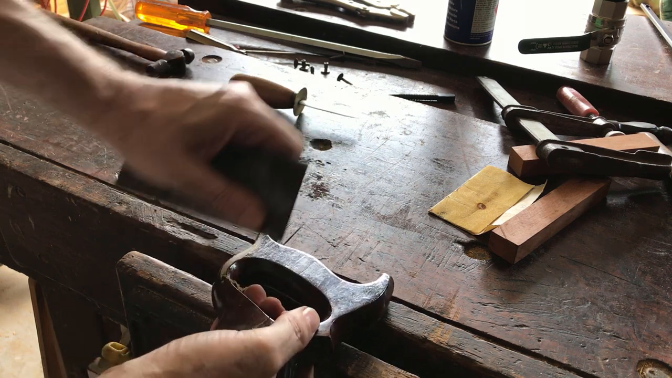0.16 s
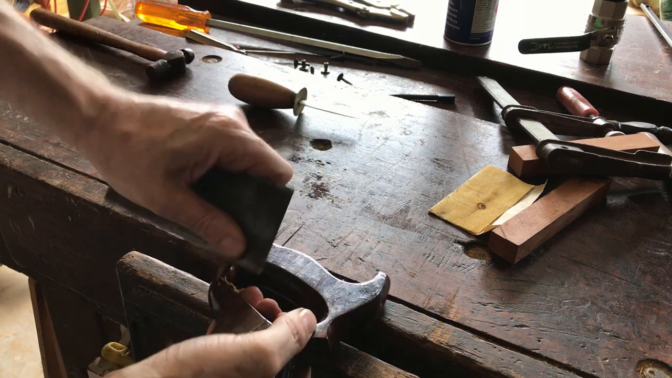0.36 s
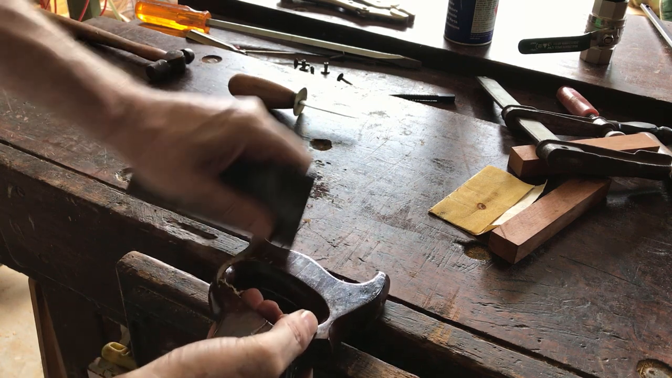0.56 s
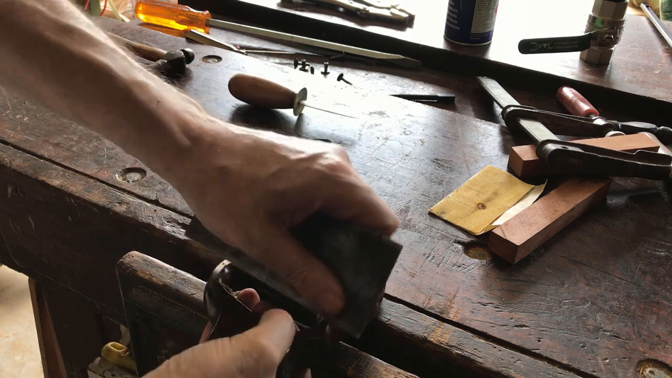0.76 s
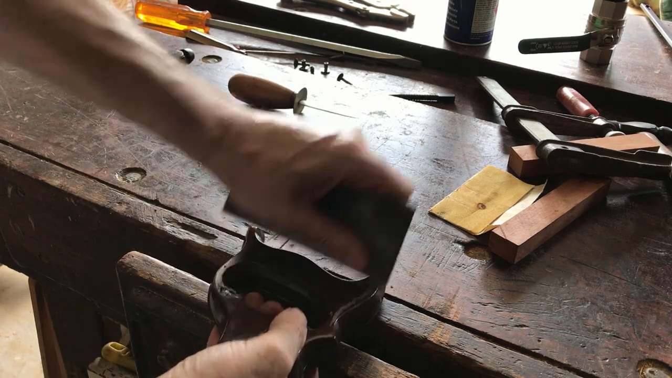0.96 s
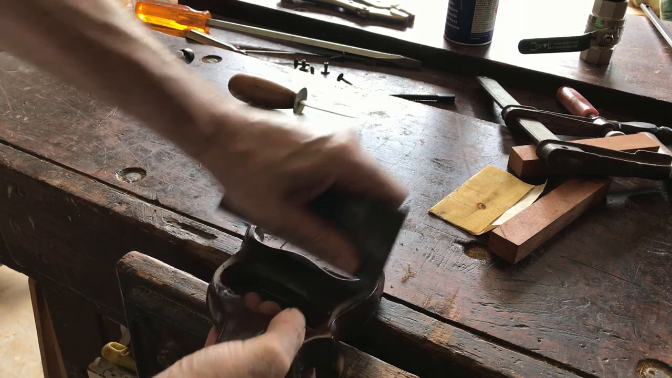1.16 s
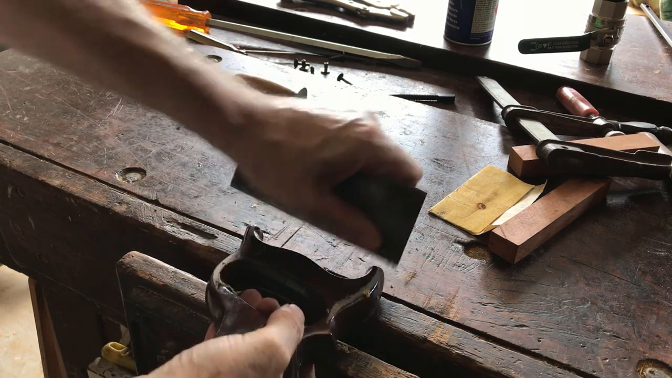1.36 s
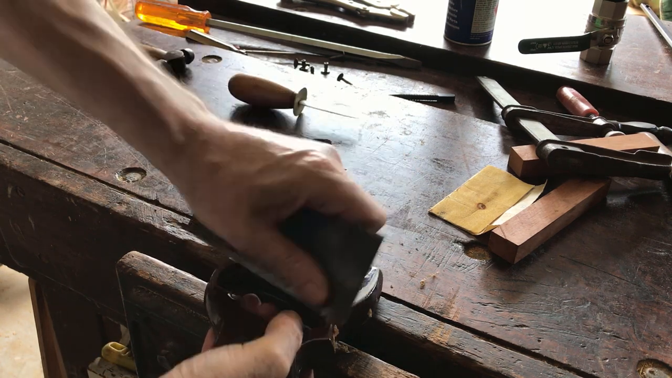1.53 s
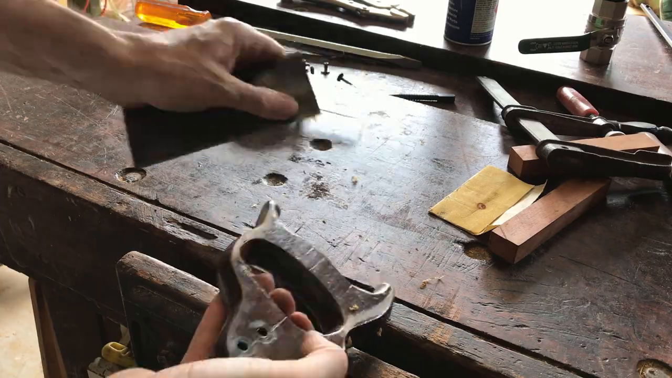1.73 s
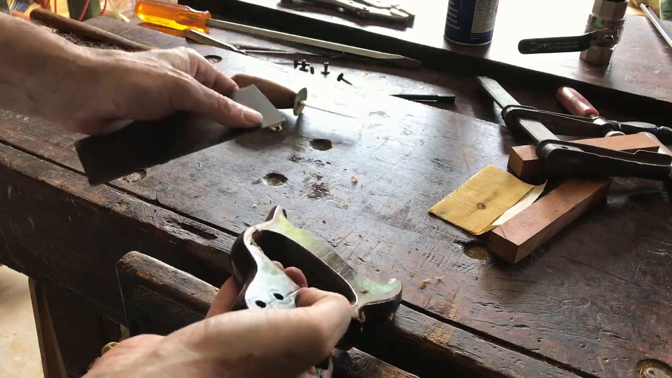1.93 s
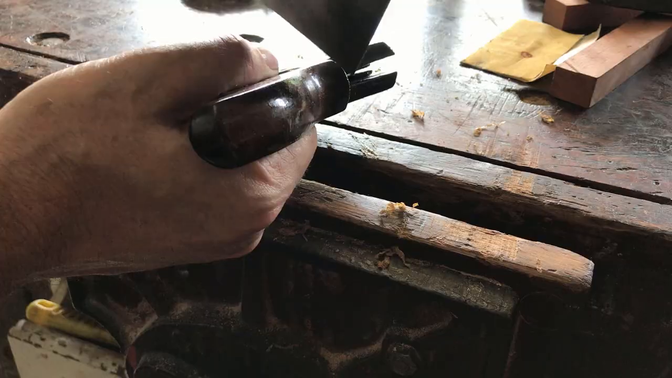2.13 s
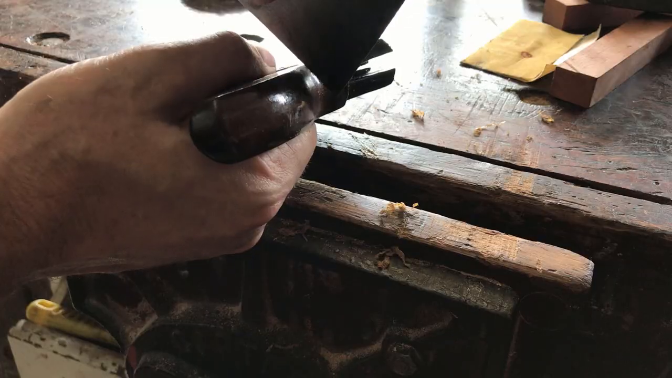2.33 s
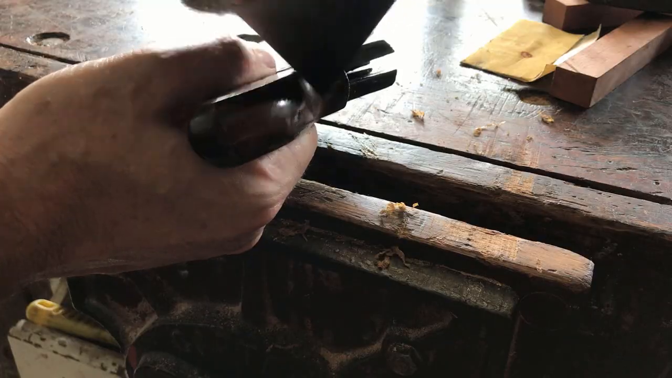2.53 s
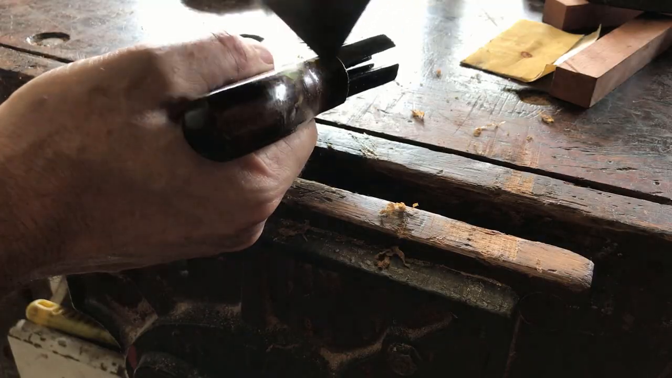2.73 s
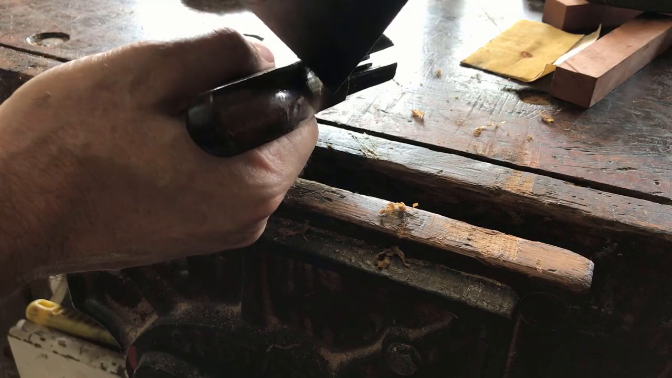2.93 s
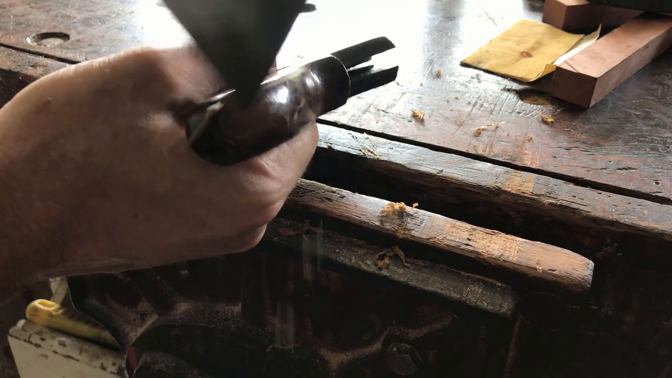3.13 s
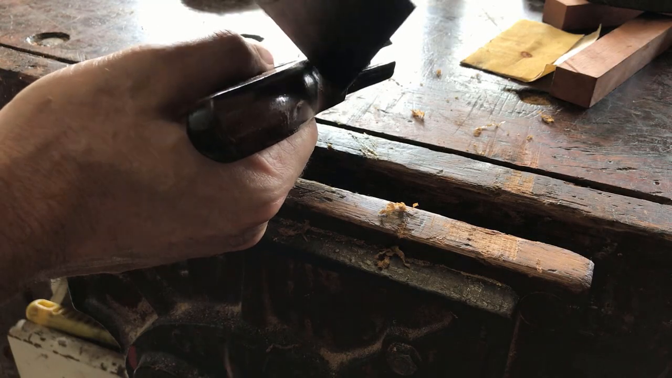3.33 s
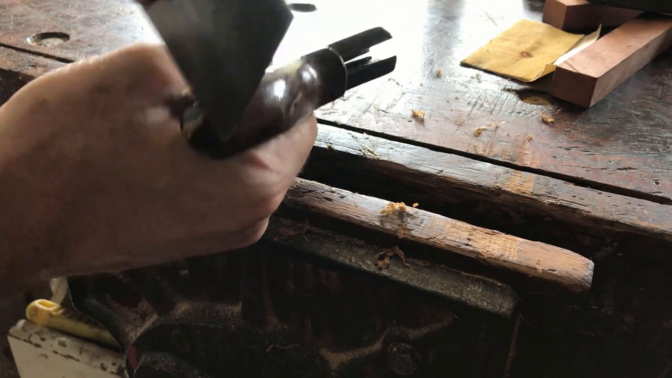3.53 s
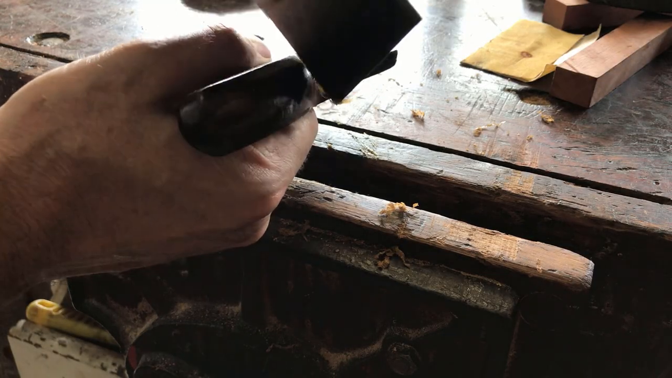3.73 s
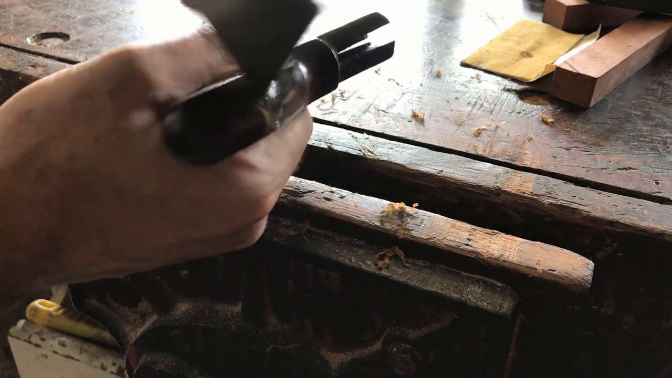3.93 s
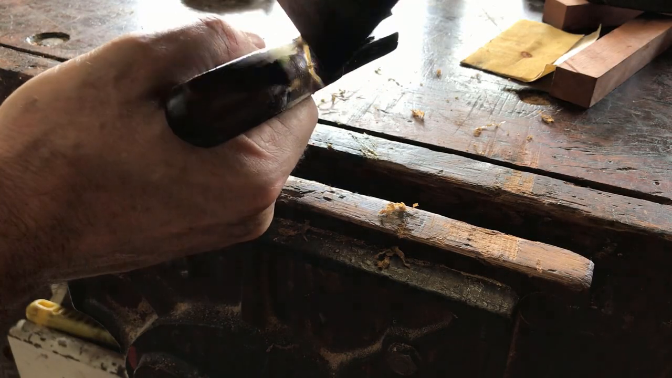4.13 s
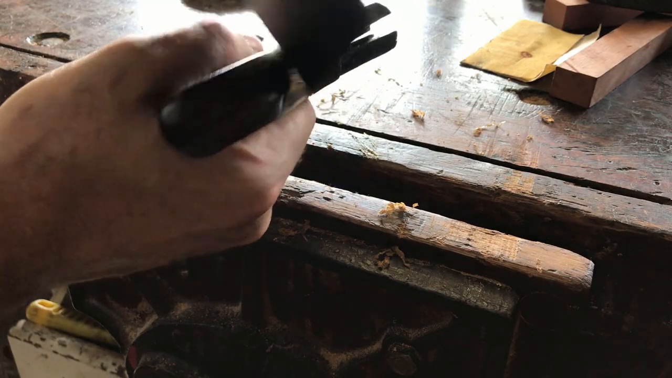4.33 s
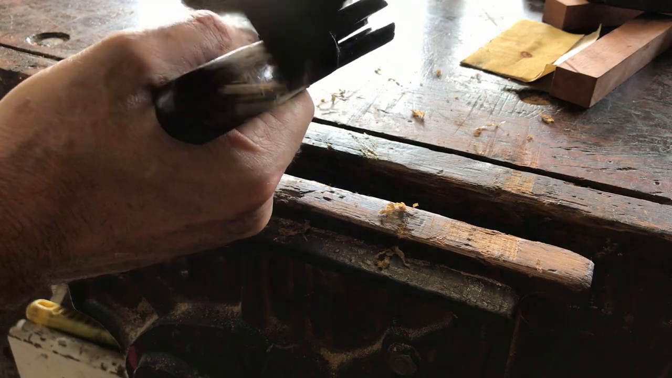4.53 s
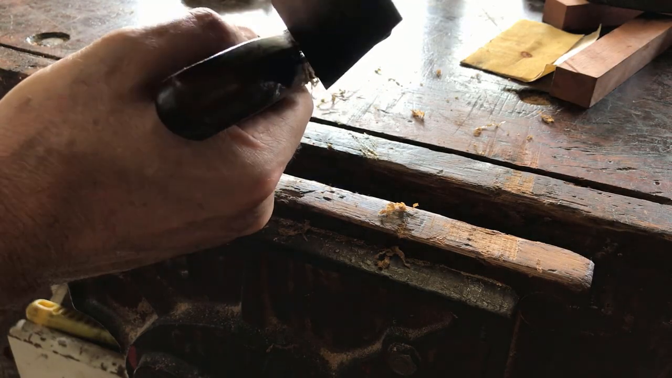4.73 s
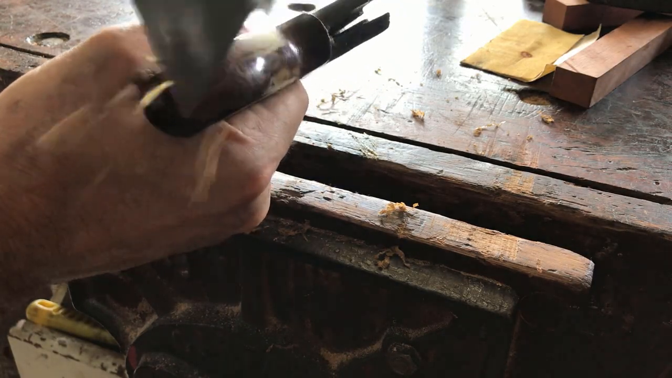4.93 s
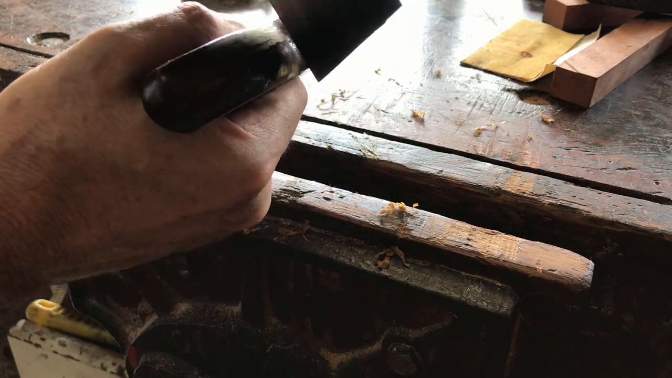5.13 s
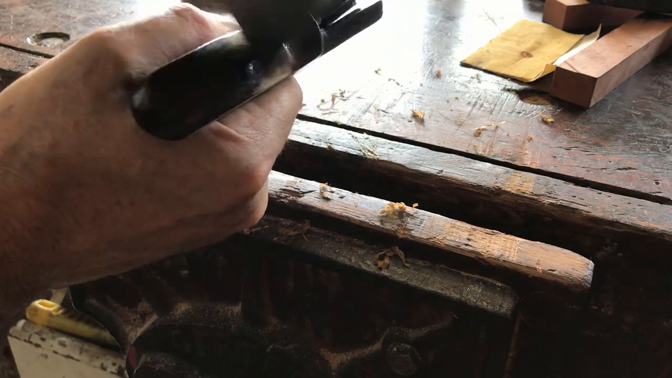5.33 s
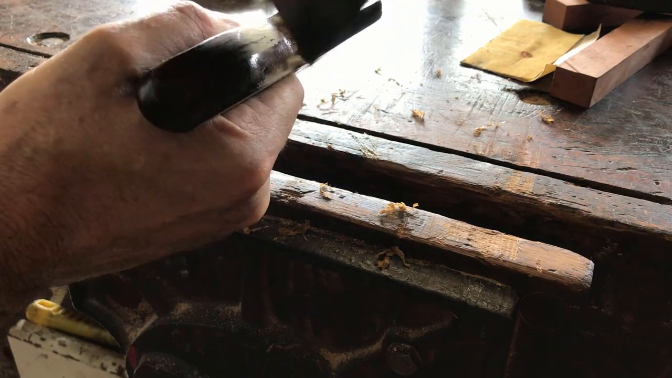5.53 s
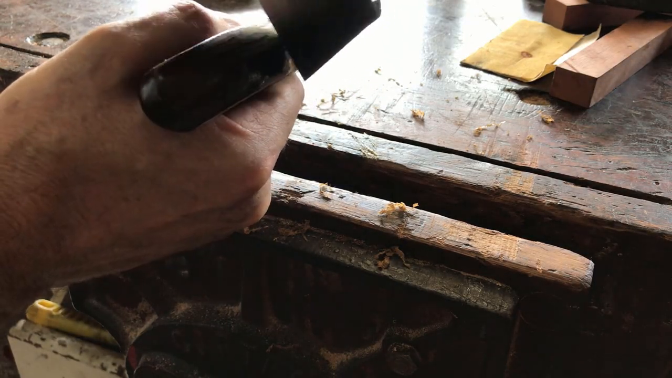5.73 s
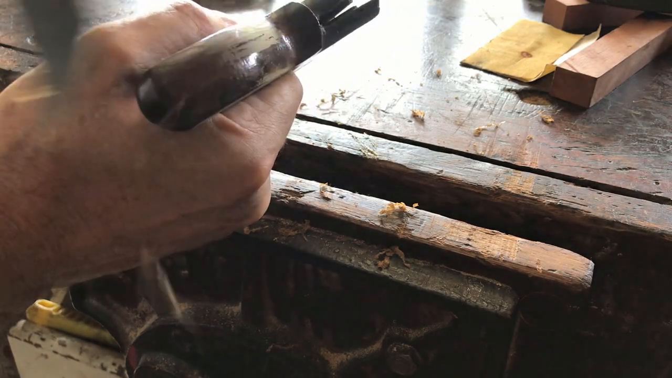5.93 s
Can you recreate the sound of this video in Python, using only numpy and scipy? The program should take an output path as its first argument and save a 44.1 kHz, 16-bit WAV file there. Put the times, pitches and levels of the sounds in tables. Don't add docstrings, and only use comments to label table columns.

```python
import sys
import numpy as np
from scipy import signal
from scipy.fft import rfft, irfft
from scipy.io import wavfile
from scipy.ndimage import uniform_filter1d

SR = 44100
rng = np.random.default_rng(int(sys.argv[2]) if len(sys.argv) > 2 else 0)


def to_linear_factor(level_db):
    exponent = np.asarray(level_db, float) / 20
    return 10 ** exponent


def generate_wav(sig):
    pcm = np.round(np.clip(np.atleast_2d(sig).T, -1, 1) * 32767).astype(np.int16)
    wavfile.write(sys.argv[1], SR, pcm)


N = 268128


def evened(x):
    return x / np.sqrt(np.mean(x ** 2) + 1e-20)


def noise():
    return rng.standard_normal(N)


def band(x, lo_hz, hi_hz):
    return signal.sosfilt(signal.butter(2, [lo_hz, min(hi_hz, 20000)], "bandpass", fs=SR, output="sos"), x)


def coloured(x, points):
    hz, db = np.transpose(points)
    f_hz = np.fft.rfftfreq(N, 1 / SR)
    gain_db = np.interp(np.log(f_hz + 1), np.log(hz + 1), db)
    return evened(irfft(rfft(x) * to_linear_factor(gain_db), N))


def wander(per_s):
    at = np.arange(0, N + SR, SR / per_s)
    return np.interp(np.arange(N), at, rng.standard_normal(int(400 * N / SR) + 500)[:len(at)])


def ring(x, modes, wander_db=0, per_s=25):
    out = np.zeros(len(x))
    for k, (hz, width_hz, db) in enumerate(modes):
        r = np.exp(-np.pi * width_hz / SR)
        mode = signal.lfilter([1 - r, 0, r - 1], [1, -2 * r * np.cos(2 * np.pi * hz / SR), r * r], x)
        drift_db = wander_db * wander(per_s) if wander_db else 0
        out += (-1) ** k * to_linear_factor(db + drift_db) * mode
    return out


def first_room():
    # (frequency [Hz], level [dB])
    room = [(25, -42), (117, -23), (150, -1), (260, -7.5), (430, -13), (1300, -18), (2700, -21),
            (11600, -28), (13500, -22), (15000, -11.5), (16000, -13.5)]
    out = to_linear_factor(-53.5 + 0.52 * wander(1.1)) * coloured(noise(), room)
    hums = [(260, 12, 0), (362, 12, -8), (190, 15, 0)]  # (frequency [Hz], width [Hz], level [dB])
    return out + to_linear_factor(-69) * evened(ring(noise(), hums, 3., 3))


def gains(tables):
    t, out = np.arange(N) / SR, np.zeros((len(tables[0][0]) - 1, N))
    for rows in tables:
        s, *columns = np.transpose(rows)
        on = slice(round(s[0] * SR), round(s[-1] * SR))
        db = np.array([np.interp(t[on], s, c) for c in columns])
        db[1:] += db[0]
        out[:, on] = to_linear_factor(db) * signal.windows.tukey(db.shape[1], .12)
    return out


def fibres(per_s, spread_db, clump_db):
    size_db = spread_db * np.minimum(rng.exponential(1, N), 4)
    snaps = (rng.random(N) < per_s / SR) * to_linear_factor(size_db) * rng.choice([-1, 1], N)
    return evened((evened(snaps) + 1.06 * noise()) * to_linear_factor(clump_db * wander(180)))


def blows(rows, modes, fall_s):
    out, t = np.zeros(N), np.arange(2000) / SR
    for (s, db), chance in zip(rows, rng.standard_normal((len(rows), 2000))):
        burst = np.r_[1.3, chance[1:]] * np.exp(-t / fall_s)
        spot = [(hz * (1 + 0.049 * a), width_hz, level_db + 2.76 * b)
                for (hz, width_hz, level_db), a, b in zip(modes, chance[-20:], chance[-40:])]
        sound = ring(burst, spot)
        out[round(s * SR):][:2000] += to_linear_factor(db) * sound / abs(sound).max()
    return out


def quick_shape(grip, hardest, lift, grip_db, hard_db, wood_db, shake_db):
    wood_under, shake_under = dict(landing=-20, grip=-12, hardest=-9, lift=-4), dict(landing=-22, grip=-23, hardest=-22.5, lift=-17)
    settle_s, lift_db = 0.0044, -16
    lag_db = 0.69 * (-24.5 - hard_db)
    wood = np.array(list(wood_under.values())) + [0, 0, min(lag_db, 4), 0] + wood_db
    shake = np.array(list(shake_under.values())) + shake_db
    s = [grip - settle_s, grip, hardest, lift]
    return np.c_[s, [grip_db, grip_db, hard_db, hard_db + lift_db], wood, shake]


def quick_strokes():
    # (grip [s], hardest [s], lift [s], grip pressure [dB], hardest pressure [dB])
    strokes = [(0.039, 0.06, 0.077, -39.5, -25.5), (0.138, 0.156, 0.17, -35.5, -23),
               (0.235, 0.248, 0.26, -37.5, -23.5), (0.327, 0.344, 0.35, -37, -28.5),
               (0.357, 0.36, 0.37, -43.5, -42.5), (0.418, 0.433, 0.45, -34, -25),
               (0.513, 0.53, 0.55, -39.5, -23), (0.6, 0.62, 0.63, -39, -29), (0.811, 0.833, 0.88, -59, -53),
               (0.879, 0.893, 0.92, -34, -25), (0.992, 1.015, 1.03, -31, -24),
               (1.097, 1.126, 1.13, -27, -27), (1.197, 1.217, 1.23, -44, -21),
               (1.286, 1.308, 1.318, -39, -20.5), (1.385, 1.403, 1.413, -31.5, -25),
               (1.483, 1.495, 1.512, -29, -23), (1.58, 1.605, 1.603, -36, -22.5)]
    # (extra wood [dB], extra bench shake [dB])
    spots = [(2, 0), (1.5, -1), (0, -2), (-1, 4), (1, 6), (2, -5), (1, -1.5), (1, 4), (-1, 2), (0.5, 6.5),
             (-3, 2.5), (-9, 6.5), (-2, 1), (-1, 4), (-3.5, -6), (0, -2), (-1.5, -5)]
    # (time [s], peak [dB], low part re peak [dB])
    edge_ticks = [(0.0316, -6.5, -14.5), (0.13, -13, -4), (0.2299, -15, -12), (0.247, -38, -4),
                  (0.3184, -15.5, -6), (0.4103, -13.5, -7.5), (0.5043, -14.5, -10), (0.532, -12.5, -7),
                  (0.5936, -23.5, -1.5), (0.8046, -27.5, -4), (0.851, -32, -3.5), (0.9807, -13.5, -14.5),
                  (1.03, -22, -12), (1.048, -19.5, -9.5), (1.0899, -8.5, -16), (1.1254, -18.5, -5),
                  (1.1891, -16.5, -5), (1.2762, -14.5, -7), (1.3769, -16, -5.5), (1.4077, -17, -13),
                  (1.4741, -14, -7.5), (1.501, -26, -19), (1.575, -12, -8), (1.6052, -12, -15),
                  (2.0842, -21.5, -2.5)]
    # (frequency [Hz], width [Hz], level [dB])
    tick_modes = [(1710, 900, -10), (2430, 890, -13), (3580, 670, -12), (6160, 2140, -4.5), (8070, 760, 3),
                  (11650, 2000, -7.5), (14700, 1300, -12)]
    # (frequency [Hz], level [dB])
    hiss_spectrum = [(710, -18.5), (1200, -20.5), (1890, -3), (2760, 0.5), (4650, -3), (5590, -3),
                     (6650, -2), (7660, 2), (8260, -2), (12700, -3), (16000, -7)]
    hiss, wood, shake = gains([quick_shape(*a, *b) for a, b in zip(strokes, spots)])
    cut = fibres(4000, 1.4, 3.07)
    out = hiss * coloured(cut, hiss_spectrum) + wood * evened(band(cut, 200, 1900))
    out += band(uniform_filter1d(shake, 900) * evened(band(noise(), 14, 126)), 7.8, 200)
    out += blows([(s, db) for s, db, low_db in edge_ticks], tick_modes[3:], 0.00076)
    low = blows([(s, db + low_db) for s, db, low_db in edge_ticks], tick_modes[:3], 0.0037)
    return out + to_linear_factor(-3.0) * low


def workshop(x, t60_s, db, hi_hz):
    t, turn, wet = np.arange(SR // 2) / SR, np.arange(N) / SR * 9., np.zeros(N)
    scatter = rng.standard_normal(len(t))
    for share, echoes in (np.cos(turn), scatter), (np.sin(turn), scatter[::-1]):
        tail = band(echoes, 440, hi_hz) * to_linear_factor(-60 * t / t60_s) * (t > .003)
        wet += signal.oaconvolve(x * share, tail / np.linalg.norm(tail))[:N]
    return x + to_linear_factor(db) * wet


def window(middle_s, length_s, edge_s):
    return np.clip((length_s / 2 - abs(np.arange(N) / SR - middle_s)) / edge_s + .5, 0, 1)


def thinned(x):
    dips_s = [.83, 2.038, 2.522, 2.757, 3.642, 3.757, 3.89, 4.99, 5.15, 5.752]
    hz = np.fft.rfftfreq(N, 1 / SR)
    faint = irfft(rfft(x) * ((hz > 900) & (abs(hz - 8700) > 1700)), N)
    return x - .8 * faint * sum(window(s, .012, .008) for s in dips_s)


def strongest(x, s, count):
    size = abs(rfft(x[round(s * SR) - 512:][:1024] * np.hanning(1024))) / 256 + 1e-9
    height = size / uniform_filter1d(size, size=40) ** .5
    at = signal.find_peaks(height[:365], distance=8)[0]
    at = at[np.argsort(-height[at])][:round(count)]
    return list(zip(at * SR / 1024, 20 * np.log10(size[at])))


def dropouts(x):
    # (middle [s], length [s], lines kept, line gain [dB])
    own_lines = [
        (0.99, 0.011, 11, 4),
        (1.078, 0.012, 1, -5),
        (1.159, 0.0087, 8, 2),
        (2.606, 0.021, 13, 6),
        (5.84, 0.017, 9, 3.5),
    ]
    # (frequency [Hz], level [dB])
    buzz, warble = [(419.9, -50), (2164, -53), (3198, -65), (6794, -68), (7763, -66), (10239, -58),
                    (10691, -62)], [(269.2, -39), (1217, -39), (1475, -39), (1895, -37.5), (2972, -34.5),
                                  (4037, -37.5), (6406, -37), (6858, -38), (7709, -31), (8172, -31),
                                  (10368, -34), (12091, -48), (14567, -37)]
    t = np.arange(N) / SR
    tone_moments = [(s, length_s, [(hz, db + gain_db) for hz, db in strongest(x, s, count)])
              for s, length_s, count, gain_db in own_lines]
    tone_moments += [(1.067, .02, buzz), (1.109, .017, warble)]
    for s, length_s, lines in tone_moments:
        tones = sum(to_linear_factor(db + 0.5) * np.sin(2 * np.pi * (hz * t + rng.random())) for hz, db in lines)
        x = x * (1 - 1.07 * window(s, length_s, 0.0026)) + tones * window(s, length_s + 0.0045, 0.01)
    return x


def second_room():
    # (frequency [Hz], level [dB])
    room, whine = [(60, -14), (125, 1), (172, -6), (420, -8.5), (700, -18.5), (1140, -11), (2000, -19.5),
                   (3500, -22.5), (5000, -30.5), (7000, -20), (12500, -20.5), (16000, -28)], [(6000, -43), (7000, -28.5), (7830, -7), (8660, 1), (9500, -6.5),
                                   (10400, -24.5), (11500, -43)]
    # (time [s], level [dB])
    hum_load = [(2.19, -49.5), (2.41, -52), (2.61, -74), (2.63, -59.5), (3.17, -55.5), (3.24, -59),
                (4.06, -57.5), (4.15, -71), (4.24, -48), (4.31, -68), (4.48, -49), (4.5, -61),
                (4.88, -53.5), (4.98, -63), (5.07, -55), (6.07, -64.5)]
    out = to_linear_factor(-61 + wander(3.39)) * coloured(noise(), room)
    out += to_linear_factor(-50 + 0.67 * wander(6.8) + 0.49 * wander(120)) * coloured(noise(), whine)
    out += to_linear_factor(-73) * evened(ring(noise(), [(700, 12, 0), (500, 12, -5)]))
    hum = evened(ring(noise(), [(64.0, 10.0, 3), (47.8, 11.6, -5.5), (117.4, 5.7, -19)]))
    return out + to_linear_factor(np.interp(np.arange(N) / SR, *np.transpose(hum_load))) * band(hum, 38, 180)


def spits():
    # (time [s], peak [dB], whistle before [dB], whistle after [dB])
    clicks = [
        (2.1787, -29, -20, -20),
        (2.1818, -9, -20, -18),
        (2.1846, 8, -20, -12),
        (2.187, 6, -9, -16),
        (2.1907, 5, -19, -10),
        (2.1931, 6, -15, -19),
        (2.196, -19, -20, -20),
    ]
    t, out = np.arange(-150, 150) / SR, np.zeros(N)
    tones = np.cos(2 * np.pi * 13000 * t + .6) + .55 * np.cos(2 * np.pi * 8500 * t)
    click = np.exp(-(t / .00008) ** 2) * tones
    for s, db, before_db, after_db in clicks:
        whistle_gain = np.where(t < 0, to_linear_factor(before_db), to_linear_factor(after_db))
        whistle = whistle_gain * np.exp(-abs(t) / .0006) * np.sin(2 * np.pi * 8600 * t)
        out[round(s * SR) - 150:][:300] += to_linear_factor(db) * (click + whistle)
    return band(out, 4320, 20200)


def long_shape(touch, bite, hardest, bite_db, hard_db, slip, hiss_db, jolt_db, thud_db):
    h = dict(touch=-9, bite=-10.5, build=-2, jolt=-29.5)
    w = dict(touch=-6.5, bite=-18.5, hardest=-24, slip=-10)
    n = dict(bite=-13.5, hardest=3.5, slip=-14.5, jolt=-20)
    creep_db_s, touch_db = 200, -14
    slip_loss_db, die_db, jolt_s, die_s = -14.5, -39.5, 0.012, 0.038
    hold_share, hold_db, ease_s, ease_db = .5, 1., .007, -7
    s = [touch, bite, hardest, slip, slip + jolt_s, slip + jolt_s + die_s]
    slip_db, thin_db = hard_db + slip_loss_db, (hiss_db - hard_db) / 2 + n["hardest"]
    start_db = bite_db + touch_db - creep_db_s * (bite - touch)
    press = [start_db, bite_db, hard_db, slip_db, jolt_db, jolt_db + die_db]
    hiss = [h["touch"], h["bite"], hiss_db + h["build"] - hard_db,
            hiss_db - slip_db, hiss_db + h["jolt"] - jolt_db, h["jolt"]]
    low = [w["touch"], w["bite"], w["hardest"],
           thud_db + w["slip"] - slip_db, thud_db - jolt_db, thud_db - jolt_db]
    thin = [n["bite"], n["bite"], thin_db, thin_db + n["slip"] - slip_loss_db, n["jolt"], n["jolt"]]
    hold_s = bite + hold_share * (hardest - bite)
    at = np.insert(s, [2, 3], [hold_s, hardest + min(ease_s, (slip - hardest) / 2)])
    held = np.insert(np.array(press, float), [2, 3], [bite_db + hold_db, hard_db + ease_db])
    shaving = np.interp(at, s, np.add(press, hiss)) - held
    return np.c_[at, held, shaving, np.interp(at, s, low), np.interp(at, s, thin)]


def long_passes():
    # (touch [s], bite [s], hardest [s], bite pressure [dB], hardest pressure [dB])
    passes = [(2.527, 2.587, 2.634, -31, -29), (2.969, 3.02, 3.09, -31, -25.5),
              (3.397, 3.427, 3.548, -32.5, -23.5), (3.89, 3.915, 3.945, -27.5, -25.5),
              (4.345, 4.357, 4.44, -31.5, -28.5), (4.806, 4.818, 4.931, -32.5, -35),
              (5.287, 5.305, 5.4, -36, -29), (5.811, 5.846, 5.889, -32, -30)]
    # (time [s], last hiss [dB], handle jolt [dB], low thud [dB])
    exits = [(2.679, -42, -39, -40.5), (3.135, -35.5, -40, -40), (3.566, -35.5, -38, -39),
             (4.003, -32, -29, -43), (4.465, -29, -33.5, -37), (4.945, -31.5, -46, -43),
             (5.421, -28.5, -38, -33.5), (5.902, -26.5, -47, -38)]
    # (time [s], peak [dB], bright part re peak [dB], dull part re peak [dB])
    knocks = [
        (2.417, -36, -29, -2.5),
        (2.9122, -14, -29, -8),
        (3.3488, -22, -19, -3),
        (3.8051, -24.5, -14.5, -4),
        (4.2808, -26, -9.5, 0),
        (4.7653, -27.5, -20, -0.5),
        (5.2574, -60.5, 4, 22),
        (5.791, -20.5, -8.5, -11),
    ]
    # (time [s], peak [dB])
    catches = [(2.6734, -14), (2.681, -11), (2.692, -16), (3.0992, -14), (3.1467, -16), (3.4845, -12),
               (3.5474, -9), (3.5894, -19.5), (3.9434, -15.5), (4.0146, -13), (4.4533, -10), (4.9484, -17),
               (5.409, -16.5), (5.428, -6), (5.8998, -10)]
    # (frequency [Hz], width [Hz], level [dB])
    handle, blade, knock = [(1596, 117, -1), (2186, 197, -2), (2472, 140, -4.5), (3000, 98, 3),
                            (3242, 150, 0), (3485, 134, 1), (4090, 500, -6.5), (4640, 86, -8.5)], [(5376, 270, 4), (5808, 200, 4), (6515, 280, 2.5),
                                            (7280, 180, -3), (8100, 1900, -12), (9270, 210, -3.5),
                                            (9990, 410, -1.5), (11720, 450, -2), (12320, 380, -1),
                                            (13620, 240, -3), (14650, 550, -1.5), (15200, 540, -4)], [(419, 98, -2.5), (596, 112, -3.5),
                                                           (867, 190, 1.5), (1180, 306, -3.5),
                                                           (1580, 280, 1.5), (2230, 245, 5.5),
                                                           (3080, 300, -5.5), (4000, 630, -24),
                                                           (5930, 810, -22.5)]
    body, hiss, low, thin = gains([long_shape(*a, *b) for a, b in zip(passes, exits)])
    cut, shave = fibres(1500, 3.5, 2.2), fibres(3000, 2.2, 1.8)
    out = body * evened(band(ring(cut, handle[1:6], 1.4), 2000, 3900))
    out += to_linear_factor(-0.5) * np.sqrt(low * body) * evened(ring(cut, handle[:1], 1.2))
    out += thin * evened(band(ring(cut, handle[6:], 1.9), 3730, 5200))
    out += to_linear_factor(-1.) * np.sqrt(hiss * body) * evened(band(ring(shave, blade[:4], 2.5, 30), 4900, 7800))
    out += to_linear_factor(5.5) * hiss * evened(band(ring(shave, blade[4:], 3.0, 30), 5400, 17000))
    out += low * evened(band(ring(cut, knock[1:4], 4.4), 220, 2000))
    out += blows([(s, db) for s, db, bright_db, dull_db in knocks], knock[4:], 0.00095)
    out += blows([(s, db + dull_db) for s, db, bright_db, dull_db in knocks], knock[:4], 0.00026)
    out += to_linear_factor(1.5) * blows([(s, db + bright_db) for s, db, bright_db, dull_db in knocks], blade, 0.00034)
    return out + to_linear_factor(-9.0) * blows(catches, handle, 0.002)


def scene():
    t = np.arange(N) / SR
    fade_s, gap_s, change_s = 2.09, 2.136, 2.179
    first = first_room() + workshop(quick_strokes(), 0.1, -14, 15000)
    first = first * np.clip((gap_s - t) / (gap_s - fade_s), .003, 1)
    second = second_room() + workshop(long_passes(), 0.31, -17.5, 11000)
    return np.tile(np.where(t < change_s, first, second), (2, 1))


def top_cut(x):
    return signal.sosfilt(signal.butter(12, 16860, fs=SR, output="sos"), x)


def record(dry):
    low_pass = signal.firwin(401, 15800, window=("kaiser", 8), fs=SR)
    x = signal.oaconvolve(dry[0], low_pass, "same")
    x = dropouts(thinned(x))
    mix = np.clip([x, x + spits()], -1, 1)
    return top_cut(mix)


dry = scene()
out = record(dry)
generate_wav(out)
```